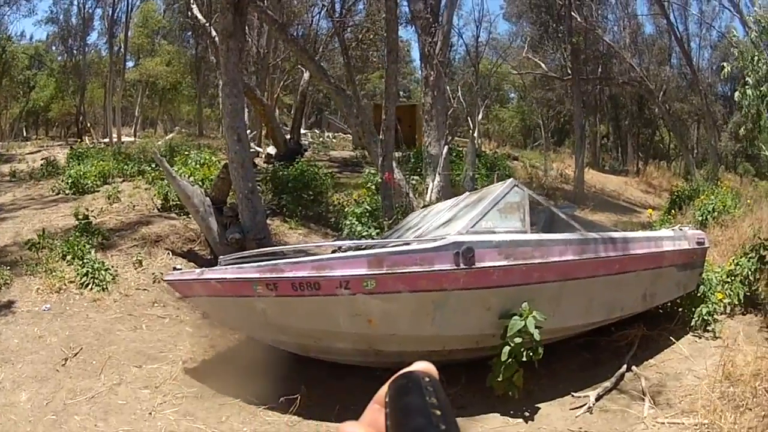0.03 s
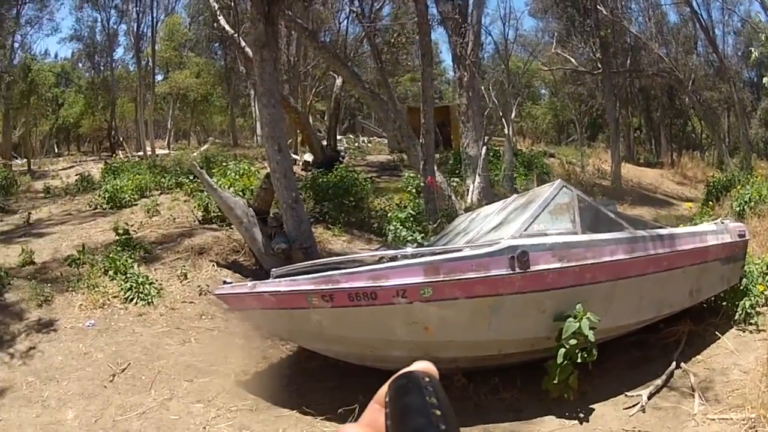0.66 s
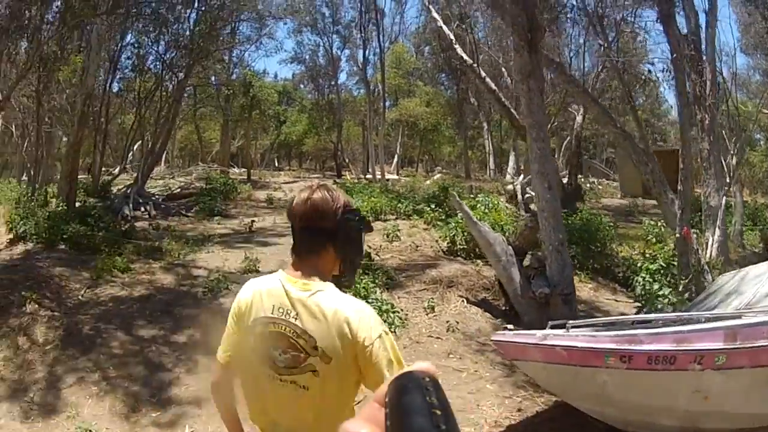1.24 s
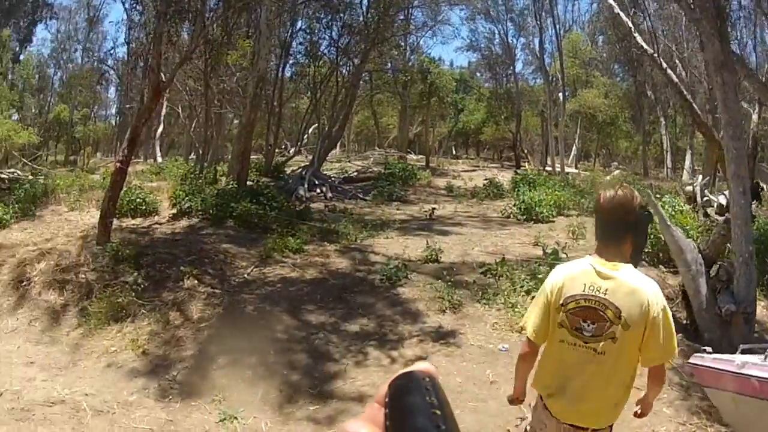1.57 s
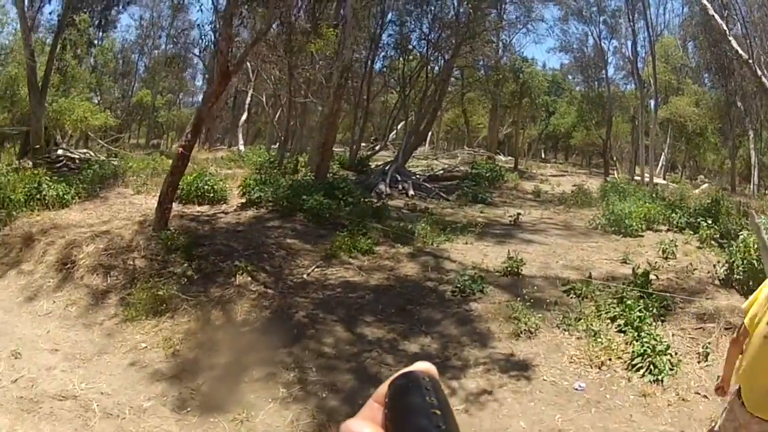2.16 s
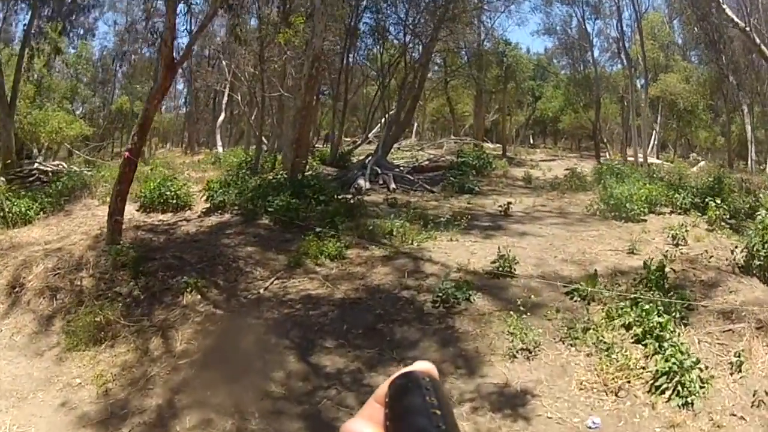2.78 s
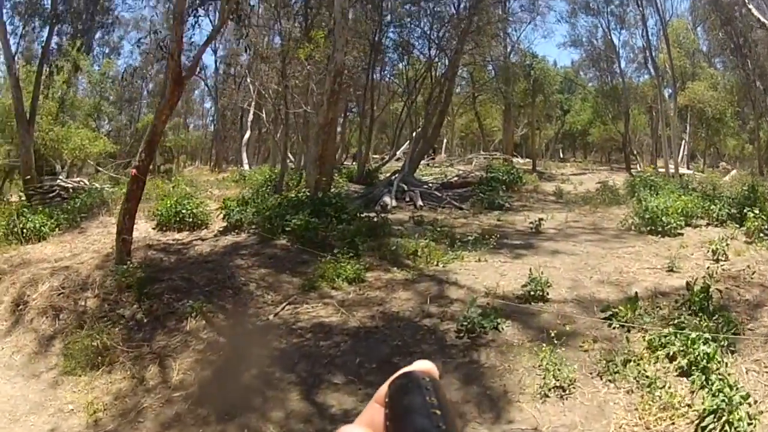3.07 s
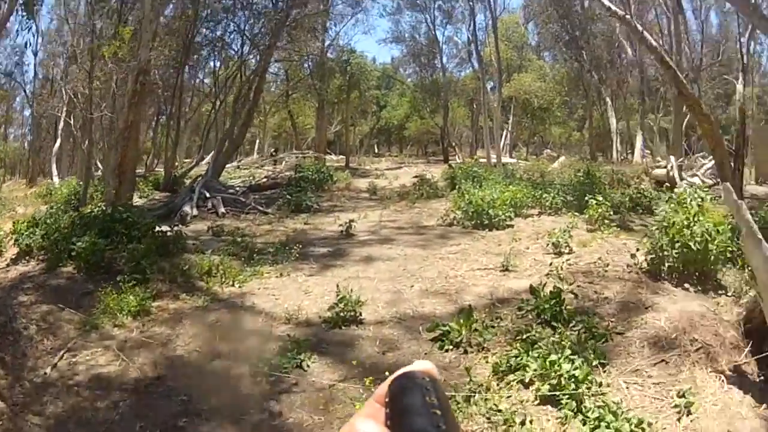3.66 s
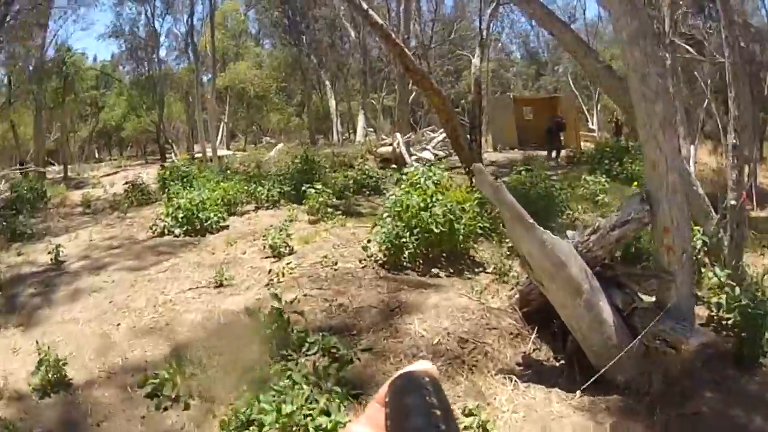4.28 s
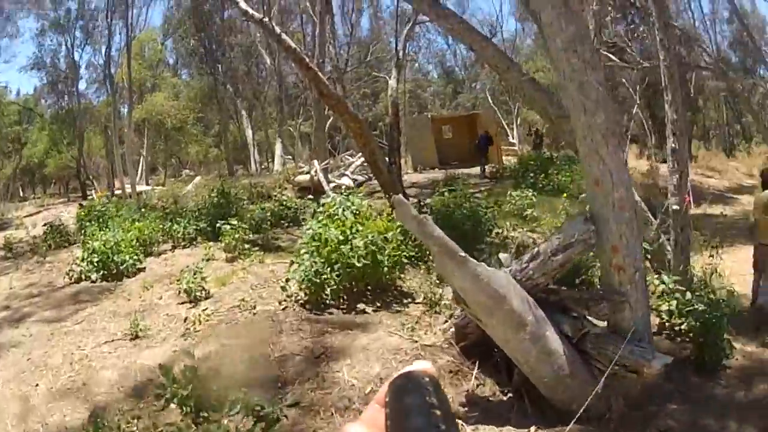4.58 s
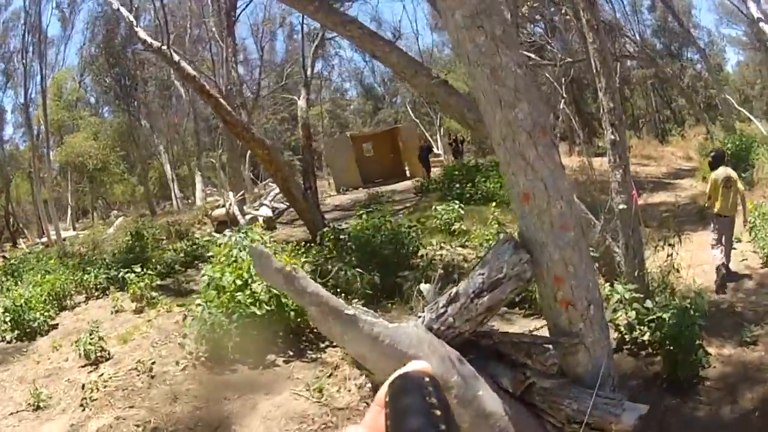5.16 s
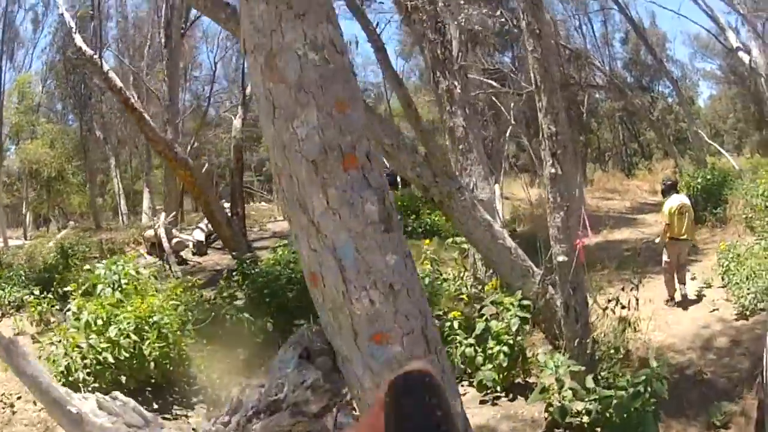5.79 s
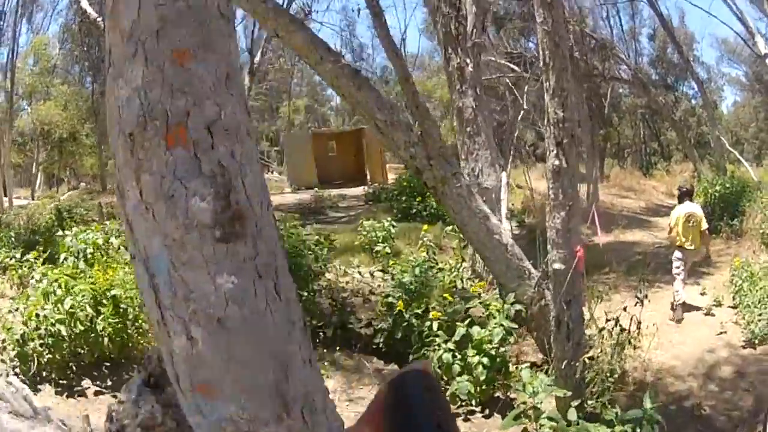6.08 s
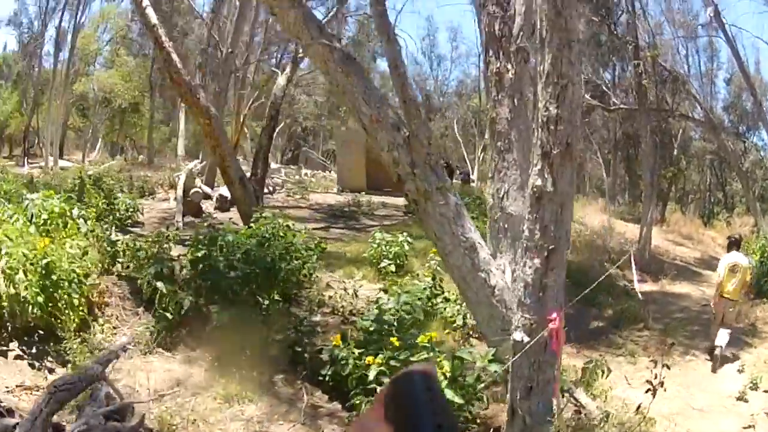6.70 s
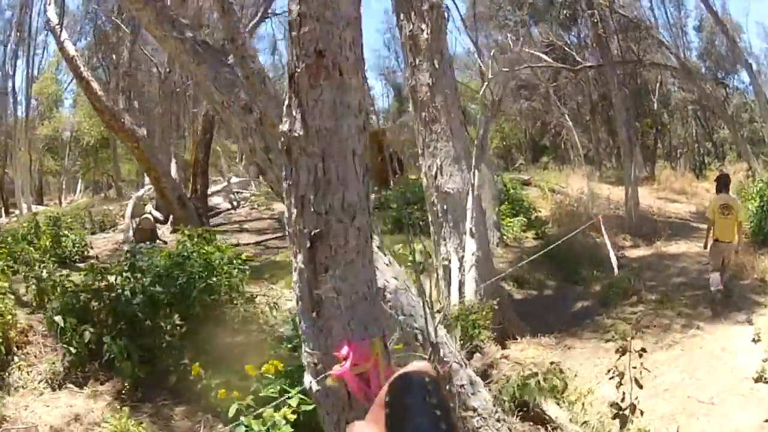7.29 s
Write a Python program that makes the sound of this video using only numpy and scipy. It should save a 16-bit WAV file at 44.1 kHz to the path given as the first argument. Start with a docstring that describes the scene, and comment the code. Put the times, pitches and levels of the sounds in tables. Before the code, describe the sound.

Paintball guns pop far off among trees, each with a short echo, at an uneven pace throughout. Close to a microphone fixed on a carried gun, footsteps make low thumps and gear knocks and scrapes, with faint crunching of dry dirt. The steps start soft and sparse, then come faster and louder toward the end. Light wind hisses in the leaves underneath.

```python
"""Walk through a grove with a paintball gun

A cased camera is fixed to the gun. Steps and sways make its mount thump; dry dirt crunches underfoot.
Gear knocks and scrapes on the gun and rings the case. Other guns pop far off among the trees,
with a brief whistle of balls in flight, over light wind in the leaves and a faint electrical whine.
The recorder holds each sample at 12 kHz, which mirrors the spectrum into the treble."""
import sys
import numpy as np
from scipy import signal
from scipy.fft import rfft, irfft
from scipy.io import wavfile
from scipy.ndimage import uniform_filter1d

SR = 44100
rng = np.random.default_rng(int(sys.argv[2]) if len(sys.argv) > 2 else 0)


def wav_record(signal):
    """Record a signal, one row per channel, as 16-bit PCM in the file named by sys.argv[1]."""
    frames = np.transpose(np.atleast_2d(signal))
    bounded = np.clip(frames, -1, 1)
    # unit amplitude maps onto the largest positive 16-bit level
    quanta = np.round(bounded * 32767).astype(np.int16)
    wavfile.write(sys.argv[1], SR, quanta)


N = 332376
TIME = np.arange(N) / SR

# case resonances for airborne sound: f/Hz, width/Hz, level/dB
CASE_RESONANCES = [(1183, 207, -1.5), (1954, 130, -0.5), (2426, 117, -6), (2884, 37, -2), (3685, 180, -7.5)]
# outdoor air spectrum: f/Hz, level/dB
AIR_SPECTRUM = [(20, -21), (80, -0.5), (200, 2), (330, -4.5), (500, -9.5), (800, -18), (1300, -21.5),
                (2200, -17.5), (3200, -23.5), (4500, -26), (5800, -26)]
# wind in the leaves: t/s, level/dB
BREEZE_CURVE = [(0, -59.5), (.3, -60.5), (1.55, -60.5), (1.85, -58.5), (2.27, -65), (3.15, -60), (5.0, -61),
                (5.73, -55.5), (6.13, -57.5), (7.54, -56)]
# electrical whine: f/Hz, level/dB
WHINE_TONES = [(5040, -76.5), (5088, -82)]
# mount shake spectrum: f/Hz, level/dB
SWAY_SPECTRUM = [(15, -56), (30, -2), (50, -14), (66, 2.5), (79, 1), (95, -2), (130, -16), (200, -27.5),
                 (400, -50), (900, -65)]
# mount shake between steps: t/s, level/dB
SWAY_CURVE = [(0.0, -51.5), (0.46, -53.5), (1.87, -46), (2.39, -47), (2.64, -32.5), (2.73, -33.5),
              (2.9, -48), (3.74, -39), (3.99, -49), (4.41, -53.5), (5.19, -40.5), (5.63, -44),
              (6.21, -44.5), (6.4, -36), (6.86, -37), (6.99, -28), (7.35, -38.5), (7.54, -41.5)]
# spectrum of gas blasts, echoes and snaps: f/Hz, level/dB
POP_SPECTRUM = [(300, -21), (800, -17), (1300, -10), (2200, 0), (3200, -3.5), (4500, -6), (5800, -2.5)]
# soles grinding dirt: t/s, relative level/dB, length/s
SOLE_SCUFFS = [(.68, -61.5, .18), (0.958, -60, 0.072), (2.39, -59.5, 0.19), (5.122, -62, .05),
               (5.227, -60.5, 0.12), (5.874, -60, 0.12), (6.158, -61, 0.034), (6.246, -61, 0.062),
               (6.6, -58, 0.11), (7.124, -56, 0.052), (7.261, -55, 0.12)]
# distant shots: t/s, peak level/dB, barrel ring f/Hz
FAR_SHOTS = [(.0225, -31.5, 3160), (.2375, -26.5, 1950), (.414, -32.5, 2300), (.604, -29.5, 2900),
             (.763, -45, 2100), (.9326, -40.5, 2730), (.963, -38.5, 2520), (1.1618, -45, 2370),
             (1.207, -43, 2440), (1.3997, -36.5, 2430), (1.6014, -42, 2500), (1.6186, -31.5, 2550),
             (1.822, -34, 2490), (1.9785, -41, 1930), (2.001, -34, 2940), (2.0552, -39, 1970),
             (2.1934, -43, 2150), (2.2765, -47, 1900), (2.9011, -35.5, 1840), (3.1386, -34.5, 2270),
             (3.3526, -38.5, 1850), (3.566, -39, 1830), (3.8454, -36.5, 1850), (4.0842, -37, 2520),
             (4.3045, -37, 2500), (4.9204, -39.5, 2680), (5.4813, -34.5, 2920), (5.7294, -36, 2720),
             (5.8002, -42, 2350), (6.1799, -36.5, 2020), (6.4128, -38.5, 1780), (6.5813, -36, 1900),
             (7.0609, -33, 2870), (7.331, -32.5, 2930), (7.4867, -22.5, 2080)]
# modes of gun and case: f/Hz, level/dB, t60/s
GUN_MODES = [(226, 4, 0.031), (292.4, 5, 0.031), (353, -5.5, 0.1), (517, -7, 0.052), (618, 0, 0.065),
             (826, -4.5, 0.07), (1066, -3.5, 0.062), (1177, 1.5, 0.032), (1424, 9.5, 0.0073),
             (1600, -1.5, 0.037), (1918, 3.5, 0.019), (2570, -21, 0.046), (2970, -28, .025),
             (3610, -11, 0.034)]
# gear scraping the gun: t/s, swell/s, release/s, relative top level/dB
GEAR_SCRAPES = [(2.51, 0.086, .04, -37.5), (2.66, 0.035, 0.025, -48.5), (2.752, 0.02, 0.066, -39),
                (5.85, 0.047, 0.047, -45), (6.47, 0.048, 0.039, -44), (6.54, .12, .06, -49),
                (6.92, 0.084, 0.095, -45)]
# gear striking the gun: t/s, level/dB, hardness (upper band over lower)/dB
GEAR_KNOCKS = [(1.492, -39.5, -12), (2.066, -41.5, -19), (2.622, -29.5, -4), (2.737, -40, -0.5),
               (2.761, -30, -24), (2.775, -25, -18), (2.873, -32.5, -9.5), (3.345, -38, -20),
               (3.626, -32, -30), (3.642, -36.5, -22), (3.693, -39.5, -11), (3.751, -43.5, -3),
               (3.808, -26, 2), (4.422, -36.5, -23), (4.651, -35.5, -18), (4.92, -43.5, 7.5),
               (4.997, -41, -22), (5.216, -31.5, 1.5), (5.634, -38.5, -37), (5.791, -32.5, -24),
               (5.912, -29.5, -6), (6.223, -38.5, -19), (6.274, -42.5, 1), (6.303, -37.5, -22),
               (6.493, -29, -16), (6.58, -33.5, 1), (6.628, -36, -4), (6.669, -34.5, -22),
               (6.835, -22.5, 2.5), (6.874, -34, -8.5), (6.885, -31, -5.5), (6.92, -25, 0.5),
               (7.006, -39, -15), (7.083, -35.5, 7.5), (7.527, -39.5, 17.5)]
# pitch favoured by a contact: hardness/dB, f/Hz
CONTACT_PITCH = [(-21.5, 275), (-6.5, 550), (-11, 960)]
# mount modes, main swing first: ratio to swing, level/dB
MOUNT_MODES = [(1, 0), (.72, -39.5), (1.45, -5), (1.95, -20.5), (2.7, -23.5)]
# steps and jolts: t/s, relative peak level/dB, swing f/Hz
MOUNT_JOLTS = [(.105, -40, 83.7), (.664, -34.5, 82.4), (1.485, -35.5, 106.7), (1.766, -25, 78),
               (2.021, -34, 77), (2.157, -42, 88), (2.405, -34.5, 87.6), (2.505, -30, 101.5),
               (2.62, -12, 79.7), (2.765, -26.5, 95.6), (2.818, -31, 85), (3.084, -37, 90),
               (3.256, -27.5, 76.4), (3.625, -30.5, 102), (3.69, -34, 109), (3.806, -23.5, 100.6),
               (4.024, -39, 98.3), (4.14, -41.5, 95.6), (4.592, -28, 86), (4.647, -31.5, 91.3),
               (4.73, -36, 91.4), (4.919, -29.5, 79), (4.957, -20, 79), (5.215, -11.5, 80.5),
               (5.281, -27, 83.3), (5.457, -27, 82.7), (5.741, -23.5, 72.8), (5.788, -27.5, 89.3),
               (5.906, -23.5, 89.5), (6.114, -30, 89), (6.221, -24, 81.4), (6.456, -29, 81),
               (6.54, -22, 77.7), (6.578, -29, 92), (6.64, -25, 97), (6.833, -5, 80.8),
               (6.872, -12.5, 80.4), (6.92, -11, 78), (6.945, -18.5, 80.7), (7.048, -19, 77.5),
               (7.085, -14.5, 81)]


def undb(db):
    """Decibels to gain."""
    return 10 ** (np.asarray(db) / 20)


def unit_rms(x):
    """Scale to rms 1."""
    return x / np.sqrt(np.mean(x ** 2))


def unit_peak(x):
    """Scale to peak 1."""
    return x / np.max(np.abs(x))


def curve(rows):
    """Gain along rows of t/s, level/dB."""
    return undb(np.interp(TIME, *np.transpose(rows)))


def add(out, start_s, x):
    """Mix x into out."""
    i = max(int(start_s * SR), 0)
    out[i:i + len(x)] += x[:max(N - i, 0)]


def delay(x, wait_s):
    """Delay, same length."""
    return np.pad(x, (int(wait_s * SR), 0))[:len(x)]


def butter(x, hz, kind, order=2):
    """Low-pass or high-pass."""
    return signal.sosfilt(signal.butter(order, hz, kind, fs=SR, output="sos"), x)


def resonate(x, hz, width_hz):
    """One resonance, gain 1 at centre."""
    return signal.lfilter(*signal.iirpeak(hz, hz / width_hz, fs=SR), x)


def noise(spectrum, size=N):
    """Noise of rms 1, shaped by rows of f/Hz, level/dB."""
    hz, db = np.transpose(spectrum)
    bins_hz = np.fft.rfftfreq(size, 1 / SR) + 1
    gain = undb(np.interp(np.log(bins_hz), np.log(hz), db))
    return unit_rms(irfft(rfft(rng.standard_normal(size)) * gain, size))


def drift(rate_hz):
    """Smooth random curve, rms 1."""
    hop = int(SR / rate_hz)
    stairs = np.repeat(rng.standard_normal(N // hop + 1), hop)
    return unit_rms(uniform_filter1d(stairs, hop)[:N])


def fade(t, t60_s):
    """Decay of 60 dB per t60_s."""
    return np.exp(-np.log(1000) * t / t60_s)


def through_case(x, leak_db=-12):
    """Airborne sound passes the resonant case walls."""
    return undb(leak_db) * x + sum(undb(db) * resonate(x, hz, width) for hz, width, db in CASE_RESONANCES)


def wind(air_db=-59):
    """Leaves hiss in the breeze over a low wash of air."""
    leaves = unit_rms(through_case(noise(AIR_SPECTRUM[3:]))) * curve(BREEZE_CURVE) * undb(drift(7.8))
    air = noise(AIR_SPECTRUM) * undb(air_db + drift(2.7))
    return leaves + air


def whine():
    """The electronics give thin steady tones."""
    return sum(undb(db) * unit_rms(np.sin(2 * np.pi * hz * TIME)) for hz, db in WHINE_TONES)


def sway(flutter_db=2.1):
    """The mount never quite rests: a low rumble."""
    return noise(SWAY_SPECTRUM) * curve(SWAY_CURVE) * undb(flutter_db * drift(14))


def grit(level_db=-70, snaps_per_s=26, uneven_db=5, t60_s=0.02):
    """Crumbs and dry leaves snap underfoot all along the way."""
    snaps = (rng.random(N) < snaps_per_s / SR) * undb(uneven_db * np.clip(rng.standard_normal(N), -2, 2))
    envelope = signal.fftconvolve(snaps, fade(TIME[:SR // 20], t60_s))[:N]
    return undb(level_db) * unit_rms(through_case(noise(POP_SPECTRUM) * envelope))


def scuffs(gain_db=-1, grains_per_s=900, uneven_db=4, cluster_db=2.2, low_hz=1300, high_hz=2800):
    """A sole crushes unequal grains, which give way in clusters."""
    out = np.zeros(N)
    grains = (rng.random(N) < grains_per_s / SR) * rng.standard_normal(N)
    grains *= undb(uneven_db * rng.standard_normal(N) + cluster_db * drift(90))
    crunch = through_case(butter(butter(grains, low_hz, "high"), high_hz, "low"))
    for start_s, db, length_s in SOLE_SCUFFS:
        part = crunch[(TIME >= start_s) & (TIME < start_s + length_s)]
        add(out, start_s, undb(db + gain_db) * unit_rms(part * signal.windows.tukey(len(part), 0.5)))
    return out


def ball_whistle(start_hz=3280, end_hz=2904, slowing_s=0.21, width_hz=160,
                 start_db=-60.5, sag_db_per_s=4, hold_s=0.7, t60_s=0.55):
    """A ball in flight whistles hoarsely; the pitch sinks as it slows."""
    hz = end_hz + (start_hz - end_hz) * np.exp(-TIME / slowing_s)
    envelope = undb(start_db - sag_db_per_s * TIME) * fade(np.maximum(TIME - hold_s, 0), t60_s)
    flutter = butter(rng.standard_normal(N), width_hz, "low")
    return unit_rms(flutter * np.sin(2 * np.pi * np.cumsum(hz) / SR)) * envelope


def tree_echo(shot_db, echo_db=-53.5, at_shot_db=-35, slope=0.71, t60_s=0.67, uneven_db=3, grain=147):
    """Trunks scatter a shot into a grainy wash that falls less with distance than the shot does."""
    trunks = np.repeat(undb(uneven_db * rng.standard_normal(SR // grain)), grain)
    wash = unit_rms(through_case(noise(POP_SPECTRUM, SR) * trunks))
    return undb(echo_db + slope * (shot_db - at_shot_db)) * wash * fade(TIME[:SR], t60_s)


def shots(blast_s=0.0019, ground_db=-5, ground_s=0.0011, ring_db=7.5, ring_width_hz=250):
    """Distant gas blasts, each with ground bounce, barrel ring and echo."""
    out, t = np.zeros(N), TIME[:SR]
    for start_s, db, hz in FAR_SHOTS:
        blast = noise(POP_SPECTRUM, SR) * t / blast_s * np.exp(-t / blast_s)
        blast += undb(ground_db) * delay(blast, ground_s * (0.5 + rng.random()))
        barrel = undb(ring_db) * resonate(blast, hz, ring_width_hz)
        pop = undb(db) * unit_peak(through_case(blast + barrel))
        add(out, start_s, pop + tree_echo(db))
    return out


def gun_ring(scatter_db=3, spread=0.018, crack_db=1, crack_hz=1400, crack_t60_s=0.015, contact_s=0.0015):
    """One tap on gun and case: a dull crack, plus modes weighted anew by each contact point."""
    t = TIME[:SR // 6]
    crack = unit_rms(butter(rng.standard_normal(len(t)), crack_hz, "low"))
    out = undb(crack_db) * crack * fade(t, crack_t60_s)
    for hz, db, t60_s in GUN_MODES:
        size, detune, polarity = rng.standard_normal(3)
        mode = np.sin(2 * np.pi * hz * (1 + spread * detune) * t) * fade(t, t60_s)
        out += np.sign(polarity) * undb(db + scatter_db * size) * mode
    return out * np.minimum(t / contact_s, 1)


def scrapes(gain_db=-1, range_db=10.5, slips_per_s=70, uneven_db=5, soft_hz=1000, contacts=4):
    """Gear sticks and slips on the gun at a few points; each slip is a soft tap."""
    out = np.zeros(N)
    for _ in range(contacts):
        slips = (rng.random(N) < slips_per_s / SR) * undb(uneven_db * rng.standard_normal(N))
        ring = butter(gun_ring(), soft_hz, "low")
        for start_s, swell_s, release_s, db in GEAR_SCRAPES:
            length_s = swell_s + release_s
            span = (TIME >= start_s) & (TIME <= start_s + length_s)
            drop_db = np.interp(TIME[span] - start_s, [0, swell_s, length_s], [range_db, 0, range_db])
            rubbing = 0.019 * rng.standard_normal(N)[span]
            force = unit_rms(slips[span] + rubbing) * undb(db - drop_db)
            add(out, start_s, signal.fftconvolve(force, ring / np.linalg.norm(ring)))
    return undb(gain_db) * out / np.sqrt(contacts)


def knocks(bounce_db=-10, bounce_s=0.002978, note_db=-2, note_slope=0.18, split_hz=1400, top_hz=2600):
    """Gear hits the gun and chatters; hard contacts bring out upper modes, soft ones a hollow note."""
    out = np.zeros(N)
    for start_s, db, hardness_db in GEAR_KNOCKS:
        ring = gun_ring()
        waits_s = np.cumsum(bounce_s * (0.5 + rng.random(3)))
        for bounce, wait_s in enumerate(waits_s, 1):
            ring += undb(bounce_db * bounce) * delay(gun_ring(), wait_s)
        note_hz = np.interp(hardness_db, *np.transpose(CONTACT_PITCH))
        ring += undb(note_db - note_slope * hardness_db) * resonate(ring, note_hz, width_hz=220)
        lower = unit_peak(butter(ring, split_hz, "low", order=3))
        upper = unit_peak(butter(butter(ring, top_hz, "low"), split_hz, "high", order=3))
        add(out, start_s, undb(db) * (lower + undb(hardness_db) * upper))
    return out


def thumps(gain_db=2.5, push_cycles=0.68, swing_t60_s=0.17, t60_at_db=-7, doubling_db=48,
           mode_t60_s=0.1, scatter_db=2, spread=0.074):
    """Each jolt swings the camera on its mount; the swing builds during the push, wide ones die fastest."""
    out, t = np.zeros(N), TIME[:SR // 2]
    for start_s, db, hz in MOUNT_JOLTS:
        push_s = push_cycles / hz
        free_s = np.maximum(t - push_s, 0)
        t60_s = swing_t60_s * 2 ** ((t60_at_db - db) / doubling_db)
        swing = np.sin(2 * np.pi * hz * t) * fade(free_s, t60_s)
        for ratio, mode_db in MOUNT_MODES[1:]:
            detune, size = rng.standard_normal(2)
            mode = np.sin(2 * np.pi * hz * ratio * (1 + spread * detune) * t) * fade(free_s, mode_t60_s)
            swing += undb(mode_db + scatter_db * size) * mode
        add(out, start_s, undb(db + gain_db) * unit_peak(swing * np.minimum(t / push_s, 1)))
    return out


def scene(low_cut_hz=38):
    """All sources at one microphone, which loses the deepest bass."""
    walker = thumps() + knocks() + scrapes() + scuffs() + grit()
    far_guns = shots() + ball_whistle()
    background = sway() + wind() + whine()
    return butter(walker + far_guns + background, low_cut_hz, "high")[None]


def record(dry, hold_hz=12000, antialias_hz=5850, top_hz=15600):
    """Sample-and-hold mirrors the spectrum around hold_hz; the top is cut."""
    antialias = signal.firwin(4001, antialias_hz, fs=SR * 40)
    slow = signal.resample_poly(dry, hold_hz, SR, axis=1, window=antialias)
    stairs = np.repeat(slow, 4, axis=1)
    held = signal.resample_poly(stairs, SR, 4 * hold_hz, axis=1)[:, 1:N + 1]
    top_cut = signal.ellip(10, 0.2, 70, top_hz, fs=SR, output="sos")
    return signal.sosfilt(top_cut, np.pad(held, ((0, 0), (0, N - held.shape[1]))))


dry = scene()
out = record(dry)
wav_record(out)
```